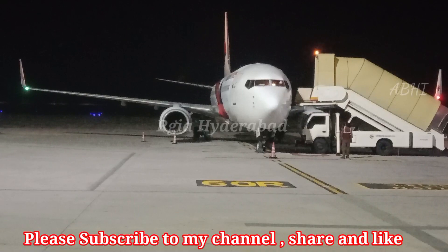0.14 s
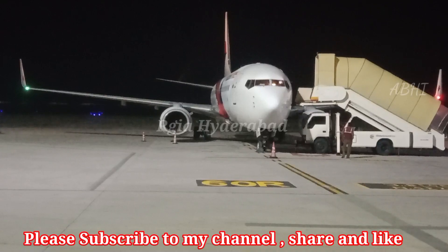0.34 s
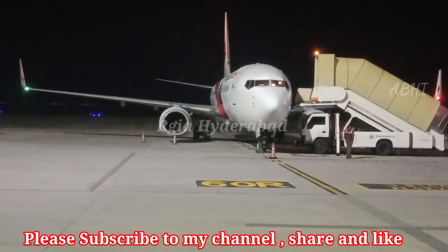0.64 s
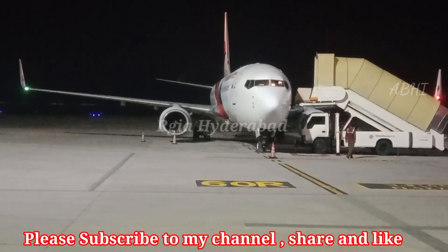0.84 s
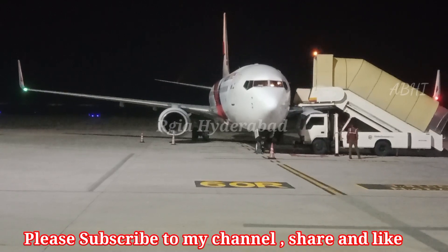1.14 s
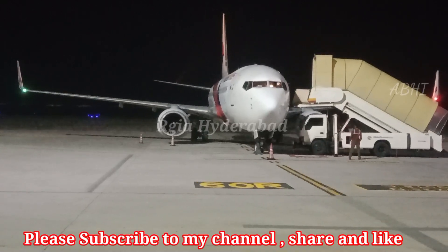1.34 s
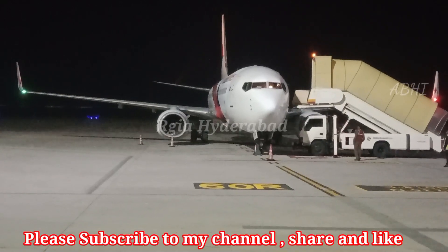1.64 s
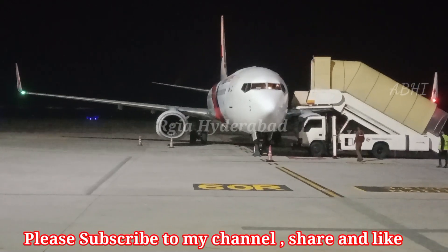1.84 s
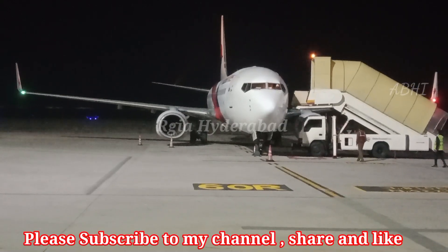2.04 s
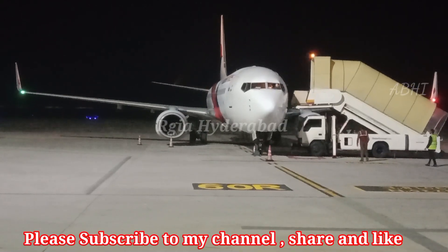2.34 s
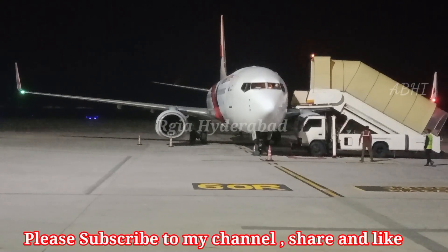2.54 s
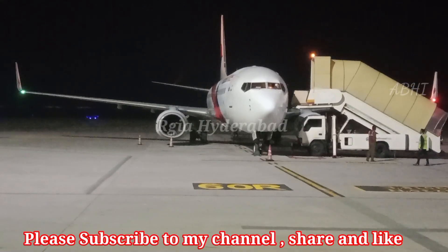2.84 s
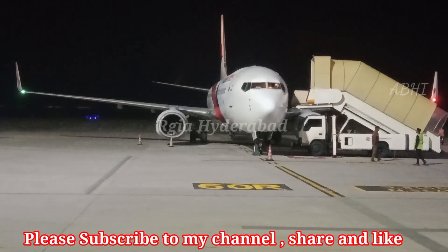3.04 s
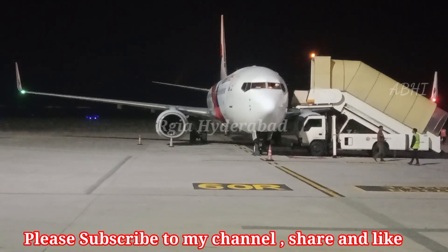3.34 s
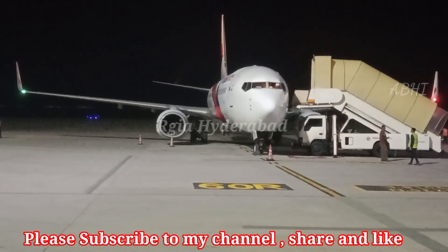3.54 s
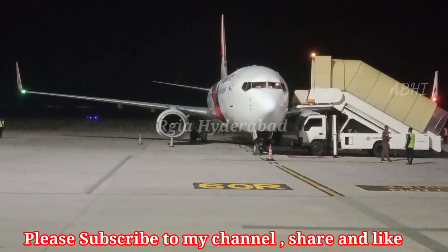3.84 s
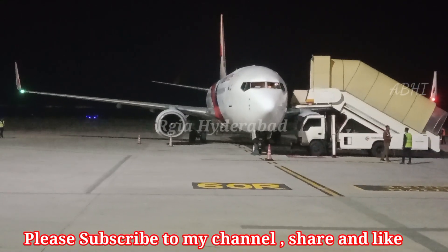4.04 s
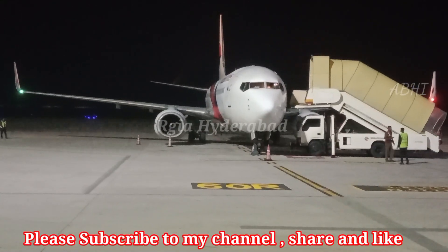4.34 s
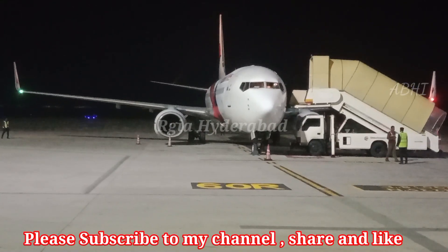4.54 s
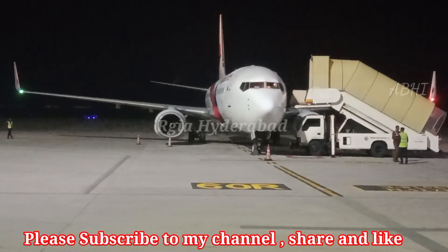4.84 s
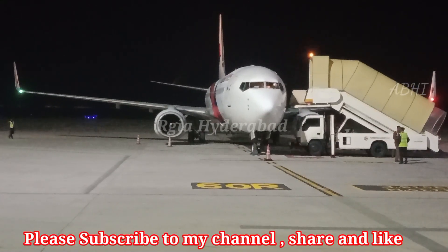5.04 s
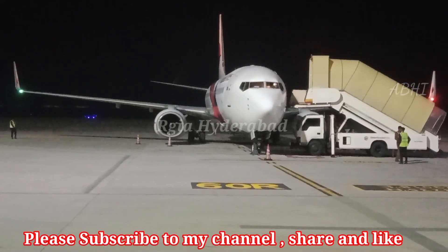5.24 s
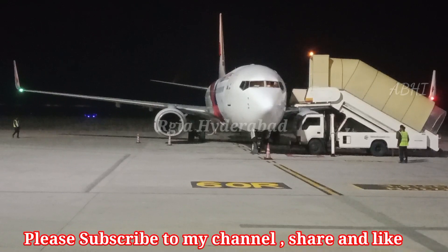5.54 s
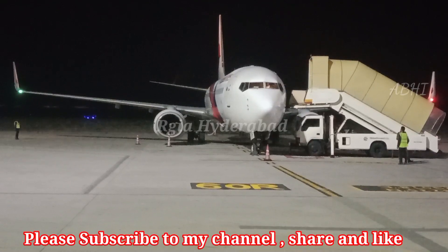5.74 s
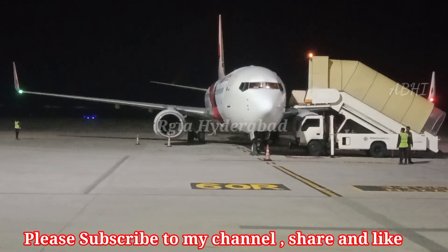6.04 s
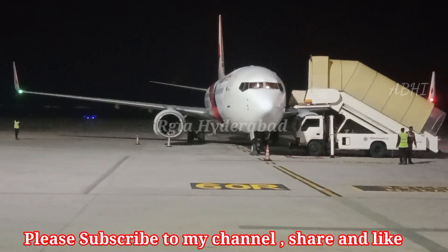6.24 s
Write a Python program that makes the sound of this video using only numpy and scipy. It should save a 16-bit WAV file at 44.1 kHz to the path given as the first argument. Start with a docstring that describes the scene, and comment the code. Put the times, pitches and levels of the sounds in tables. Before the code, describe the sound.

Steady turbine hiss from a standing jet, with an uneven low roar, faint high whining tones and one bright click at the end.

```python
"""A night apron, in front of a parked airliner whose auxiliary turbine runs steadily.
Turbulence makes broadband noise: the exhaust roars, rumbles and puffs, ducts rush, the intake hisses.
Rotation makes tones: a thin whine at the compressor's blade-passing frequency and faint humming fans.
At the end a short bright rasp swells into a click. Both channels carry the same sound."""
import sys
import numpy as np
from scipy import signal
from scipy.fft import rfft, irfft, next_fast_len
from scipy.io import wavfile
from scipy.ndimage import map_coordinates

SR = 44100
rng = np.random.default_rng(int(sys.argv[2]) if len(sys.argv) > 2 else 0)


def persist_wave(psi):
    """Save psi, clipped to +-1, as 16-bit WAV."""
    counts = np.round(np.clip(psi, -1, 1) * 32767).astype(np.int16)
    wavfile.write(sys.argv[1], SR, np.atleast_2d(counts).T)


N = 282240
TIME = np.arange(N) / SR


def amp(db):
    """Amplitude ratio of a level: 20 dB is a factor of ten."""
    return 10 ** (np.asarray(db) / 20)


def unit(x):
    """Normalisation to rms 1."""
    return x / np.sqrt(np.mean(x ** 2) + 1e-20)


def curves(rows):
    """Linear interpolation: one value per sample for each column after the time."""
    times, *columns = np.transpose(rows)
    return [np.interp(TIME, times, column) for column in columns]


def bumps(rows, half_s):
    """Superposed Gaussian pulses from (time [s], height) rows, each down to 1/e at half_s."""
    return sum(height * np.exp(-((TIME - s) / half_s) ** 2) for s, height in rows)


def wobble(per_s):
    """Slow random modulation: a spline through per_s Gaussian values a second."""
    return map_coordinates(rng.standard_normal(int(N * per_s / SR) + 4), [TIME * per_s])


def filtered(x, response):
    """Linear filtering: the spectrum of x is multiplied by a frequency response."""
    size = next_fast_len(N + SR // 2)
    return irfft(rfft(x, size) * response(np.fft.rfftfreq(size, 1 / SR)), size)[:N]


def coloured_noise(spectrum, patchy_db=0.0, patch_hz=600, patch_s=0.054):
    """Spectrally shaped noise of rms 1, modulated in random patches of time and frequency."""
    spectrogram = signal.stft(rng.standard_normal(N), nperseg=512)[2]
    bins, frames = np.mgrid[-16:17, -40:41]
    offset_hz, offset_s = bins * SR / 512, frames * 256 / SR
    patch = np.exp(-(2 * offset_hz / patch_hz) ** 2 - (2 * offset_s / patch_s) ** 2)
    field = signal.fftconvolve(rng.standard_normal(spectrogram.shape), patch, "same")
    patch_gain = amp(patchy_db * np.minimum(unit(field), 1.5))
    noise = signal.istft(spectrogram * patch_gain, nperseg=512)[1][:N]
    knots_hz, db = np.transpose(spectrum)
    return unit(filtered(noise, lambda hz: amp(np.interp(np.log(hz + 1), np.log(knots_hz), db))))


def narrow_band(centre_hz, width_hz):
    """Quadrature modulation: slow noise on a steady or gliding carrier gives a band of rms 1."""
    skirt = lambda hz: 1 / (1 + (hz / (0.84 * width_hz)) ** 2)
    in_phase, quadrature = (filtered(rng.standard_normal(N), skirt) for _ in range(2))
    phase = 2 * np.pi * np.cumsum(centre_hz * np.ones(N)) / SR
    return unit(in_phase * np.cos(phase) + quadrature * np.sin(phase))


def two_paths(x, delay_s, echo, drift):
    """Comb filtering: a second path interferes with the direct one; moving air shifts the notches."""
    lag = delay_s * (1 + drift * wobble(9)) * SR
    strength = np.clip(echo * (.35 + wobble(16)), -.9, .9)
    delayed = map_coordinates(x, [np.arange(N) - lag], order=3)
    return (x - strength * delayed) / np.sqrt(1 + strength ** 2)


def airframe_reflections(x, echo_db, count=12):
    """Interference: weak echoes from hull and stairs ripple the spectrum; the result has rms 1."""
    delays_s = rng.uniform(.002, .03, count)
    gains = amp(echo_db) * rng.standard_normal(count) / np.sqrt(count)
    impulse_response = np.bincount((delays_s * SR).astype(int), gains)
    impulse_response[0] = 1  # direct path
    return unit(signal.fftconvolve(x, impulse_response)[:N])


def fans():
    """Rotor tones: fans and generator give faint narrow bands, each fading on its own."""
    # tones before their common drift: (frequency [Hz], width [Hz], level [dB])
    partials = [(400, 4, -53), (1150, 7, -52.5), (1219, 9, -50), (2298, 11, -53.5), (2418, 6, -62),
                (4517, 14, -64), (9042, 22, -56)]
    tones = sum(amp(db) * narrow_band(hz, width) for hz, width, db in partials)
    drift_db, = curves([(0, -3.5), (2.2, 0), (3.4, -1.5), (4.6, 3), (6.4, -0.5)])
    return amp(drift_db) * tones


def rasp(click_s=6.388, t60_s=0.11):
    """Amplitude modulation: a ringing band of noise swells into a click that decays exponentially."""
    # course of the rasp: (time [s], relative level [dB], centre frequency [Hz])
    course = [(5.8, -54, 2200), (6.03, -37.5, 2204), (6.18, -39.5, 2002), (6.31, -32, 1900),
              (6.35, -33, 2100), (6.37, -27, 2254), (6.377, -23, 2130), (6.388, -22, 2070),
              (6.4, -28, 2130)]
    # spectrum of its bright edge and the click: (frequency [Hz], relative level [dB])
    edge_spectrum = [(1200, -32), (1700, -4.5), (2600, -5), (3300, -15), (4200, -3), (5500, -13),
                     (8500, -7), (13000, -31)]
    level_db, centre_hz = curves(course)
    ring = amp(level_db - 4.0) * narrow_band(centre_hz, width_hz=260)
    age = np.maximum(TIME - click_s, 0)
    click = amp(-32 - 60 * age / t60_s) * (TIME > click_s)
    edge = (amp(level_db - 9.5) + click) * coloured_noise(edge_spectrum)
    return (ring + edge) * (TIME > course[0][0])


def compressor(flicker_db=2.5, jitter_hz=11):
    """Blade-passing tone: it follows the shaft speed and flickers in the wind, amid turbulent bands."""
    # pitch of the blade tone: (time [s], frequency [Hz])
    pitches = [(0, 14984), (2.3, 14982), (3.5, 14958), (4.7, 14905), (5.3, 14895), (6.2, 14945)]
    # its strength, high at first and then faint: (time [s], level [dB])
    levels = [(0, -48), (.13, -32), (.25, -40), (.95, -46), (1.27, -38), (1.45, -46), (2.0, -49),
              (2.3, -37), (2.5, -48), (2.66, -39), (3.1, -44), (3.9, -58), (6.4, -47)]
    # turbulence around the tone: (mean frequency [Hz], width [Hz], mean level [dB])
    haze_bands = [(14450, 60, -51), (14400, 350, -48), (15030, 330, -42.5)]
    blade_hz, = curves(pitches)
    blade_db, = curves(levels)
    phase = 2 * np.pi * np.cumsum(blade_hz + jitter_hz * wobble(60)) / SR
    flicker = amp(flicker_db * (wobble(12) + wobble(30)))
    tone = amp(blade_db) * unit(flicker * np.sin(phase))
    relative_speed = blade_hz / np.mean(blade_hz)
    haze = sum(amp(db + 1.2 * wobble(5.2)) * narrow_band(hz * relative_speed, width)
               for hz, width, db in haze_bands)
    return tone + haze


def airflow(churn_depth_db=.5):
    """Flow noise: turbulent air rushes through the ducts and churns around the intake."""
    # air-conditioning ducts: (frequency [Hz], relative level [dB])
    duct_spectrum = [(400, -55), (630, -23), (700, -6.5), (755, -1), (810, -3), (950, 1.5), (1025, -4),
                     (1120, -0.5), (1210, -1), (1255, -6.5), (1340, -9.5), (1500, -22), (2500, -58)]
    # rush around the intake: (frequency [Hz], relative level [dB])
    middle_spectrum = [(900, -44), (1380, -10.5), (1485, 4.5), (1545, -4), (1730, 2), (2000, -2),
                       (2300, -14), (3200, -46)]
    # its brighter part: (frequency [Hz], relative level [dB])
    bright_spectrum = [(1500, -67), (2080, -6), (2340, 1), (2650, -2), (3150, -5.5), (3350, -8.5),
                       (3680, -8), (4000, -13), (4600, -10), (5250, -9), (5600, -18), (7500, -34)]
    # slow drift of the bands: (time [s], duct level [dB], middle level [dB], bright level [dB])
    levels = [(0, -42, -43, -40), (1.3, -41.3, -41, -39.5), (2.5, -39.5, -41.5, -41.2),
              (3.5, -42.5, -44.5, -40.5), (4.8, -41, -43.5, -40), (6.4, -44, -42, -39.5)]
    duct_db, middle_db, bright_db = curves(levels)
    churn_db = churn_depth_db * wobble(28)
    duct = coloured_noise(duct_spectrum, patchy_db=2.5, patch_hz=200, patch_s=0.033)
    middle = coloured_noise(middle_spectrum, patchy_db=3.5, patch_hz=346, patch_s=0.03)
    bright = coloured_noise(bright_spectrum, patchy_db=2.0, patch_hz=300, patch_s=0.03)
    intake = amp(middle_db + churn_db) * middle + amp(bright_db + churn_db) * bright
    return two_paths(amp(duct_db) * duct + intake, delay_s=.00146, echo=.3, drift=.03)


def intake_hiss(start_db=-34, db_per_s=-0.07):
    """High-frequency flow noise: the intake hisses smoothly, coloured by reflections."""
    # hiss at the intake: (frequency [Hz], relative level [dB])
    spectrum = [(2500, -20), (4100, -20.5), (4600, -12), (5250, -9), (5550, -8.5), (7200, -4), (8150, -3.5),
                (8600, 1.5), (9300, 0.5), (9700, -2), (10050, -0.5), (10900, 0.5), (12300, -7),
                (13600, -10.5), (15500, -14)]
    hiss = coloured_noise(spectrum, patchy_db=1.66, patch_hz=200, patch_s=0.029)
    return amp(start_db + db_per_s * TIME) * airframe_reflections(hiss, echo_db=-13.5)


def exhaust_rumble(start_db=-54.5, db_per_s=-.9, lump_db=4.5):
    """Unsteady outflow: the exhaust radiates a lumpy rumble and, now and then, a low puff."""
    # the rumble: (frequency [Hz], relative level [dB])
    rumble_spectrum = [(20, -33), (45, -35), (60, -17.5), (75, -15), (92, -5), (104, -3), (115, 4),
                       (128, -0.5), (165, -4.5), (240, -6), (400, -60)]
    # the thud of a puff: (frequency [Hz], relative level [dB])
    thud_spectrum = [(30, -28), (80, -27), (125, -7), (280, 16), (400, -22), (700, -50)]
    # puffs of gas: (time [s], rumble peak level [dB], thud peak level [dB])
    puffs = [(.15, -46, -50), (.36, -50, -53), (.5, -55, -43), (.59, -46, -52), (.77, -47, -52),
             (1.07, -46, -50), (1.22, -47, -45), (1.46, -43, -54), (1.66, -44, -48), (1.85, -51, -36),
             (2.03, -51, -58), (2.79, -41, -55), (2.94, -45, -53), (3.82, -48, -54), (4.02, -48, -33),
             (4.36, -44, -41), (4.67, -47, -52), (5.27, -59, -41), (5.8, -45, -52), (5.97, -52, -33),
             (6.2, -48, -49)]
    lumps = amp(start_db + db_per_s * TIME + lump_db * wobble(18))
    swells = bumps([(s, amp(db)) for s, db, _ in puffs], half_s=0.031)
    thuds = bumps([(s, amp(db)) for s, _, db in puffs], half_s=0.023)
    rumble = np.hypot(lumps, swells) * coloured_noise(rumble_spectrum)  # powers add
    return rumble + thuds * coloured_noise(thud_spectrum)


def exhaust_roar(level_db=-37.9, throb_db=1.2):
    """Jet noise: turbulent hot gas roars in uneven throbs."""
    # the roar, falling steeply above its peak: (frequency [Hz], relative level [dB])
    spectrum = [(20, -50), (80, -46), (160, -18), (205, -12), (280, -0.5), (320, 3), (360, -3), (410, 1),
                (480, 1), (560, -12.5), (625, -24), (900, -65)]
    # surges of the roar: (time [s], rise [dB])
    surges = [(.06, 8), (1.03, 6.5), (1.3, 4), (2.05, 3.5), (2.66, 4), (3.01, 6), (3.48, 5), (3.68, 6),
              (4.04, 10), (4.15, 5), (4.39, 6), (4.6, 7), (4.72, 3), (5.26, 8), (5.96, 6), (6.07, 4.5),
              (6.23, 2), (6.34, 6)]
    # its brief lulls: (time [s], drop [dB])
    lulls = [(.13, 6.5), (1.14, 4), (1.51, 12), (2.32, 12), (2.49, 8), (3.55, 7), (4.47, 4), (5.32, 12),
             (6.02, 3), (6.16, 11)]
    swing_db = throb_db * wobble(22) + bumps(surges, half_s=0.013) - bumps(lulls, half_s=0.028)
    roar = coloured_noise(spectrum, patchy_db=3.5, patch_hz=131, patch_s=0.023)
    return amp(level_db + swing_db) * roar


def scene():
    """Superposition: all sources add at one listening point, which feeds both channels."""
    mono = exhaust_roar() + exhaust_rumble() + airflow() + intake_hiss() + compressor() + fans() + rasp()
    return np.array([mono, mono])


def record(dry, top_hz=15500):
    """Band limiting: an ideal low-pass filter passes nothing above top_hz."""
    return np.array([filtered(channel, lambda hz: hz < top_hz) for channel in dry])


dry = scene()
out = record(dry)
persist_wave(out)
```